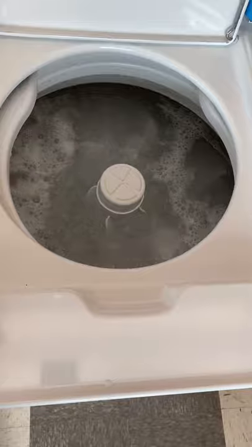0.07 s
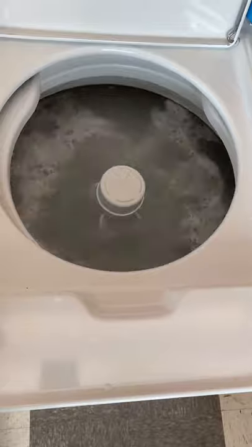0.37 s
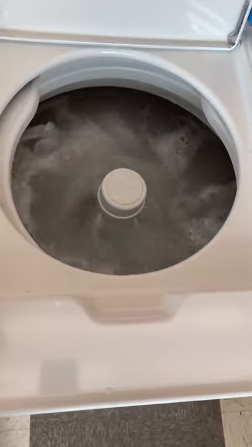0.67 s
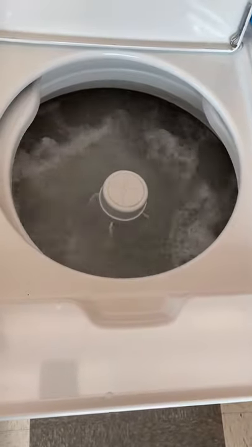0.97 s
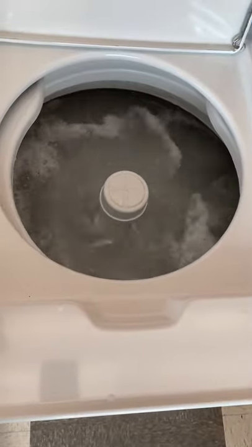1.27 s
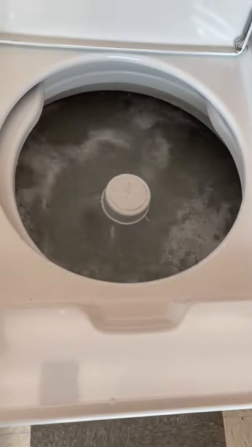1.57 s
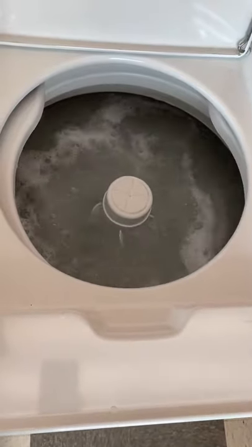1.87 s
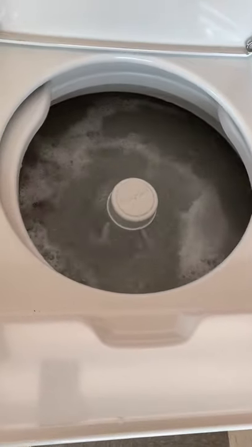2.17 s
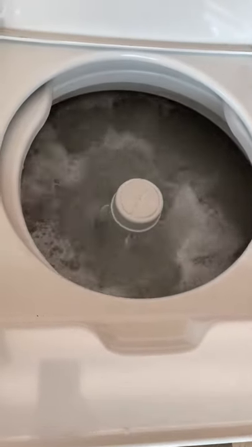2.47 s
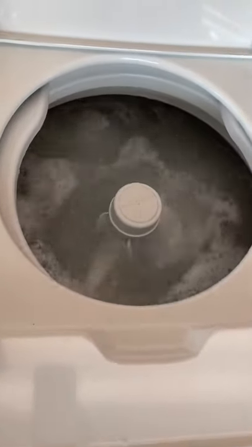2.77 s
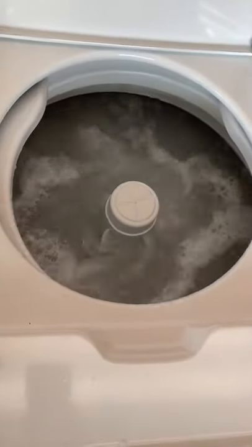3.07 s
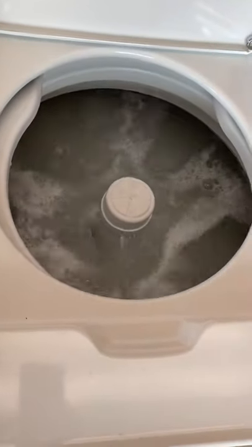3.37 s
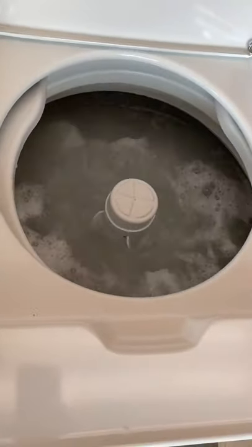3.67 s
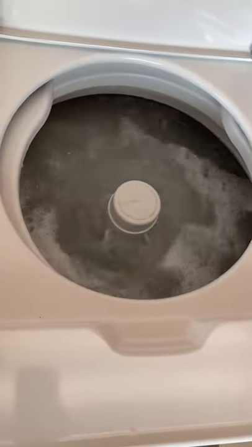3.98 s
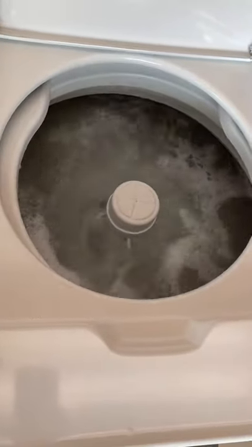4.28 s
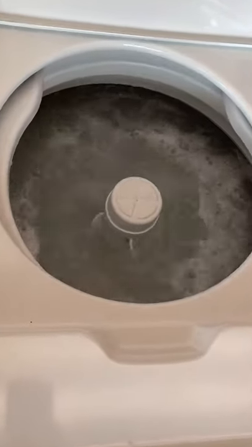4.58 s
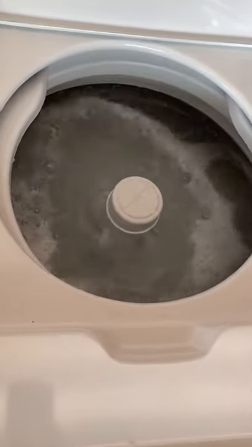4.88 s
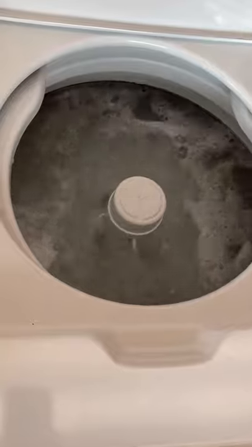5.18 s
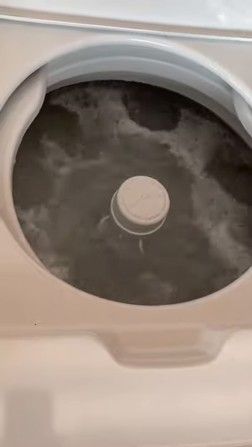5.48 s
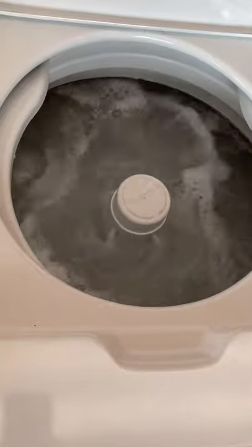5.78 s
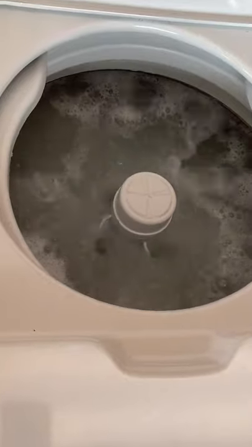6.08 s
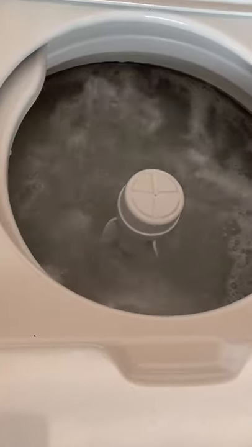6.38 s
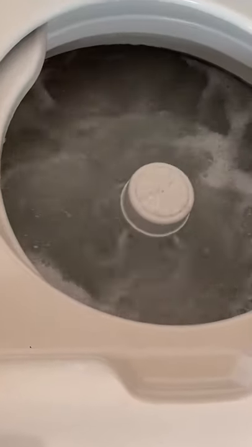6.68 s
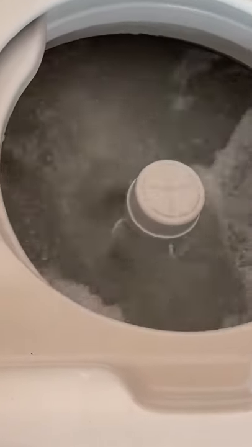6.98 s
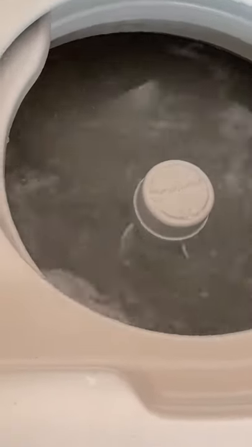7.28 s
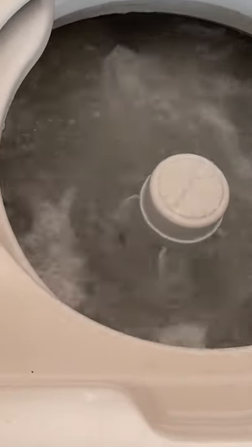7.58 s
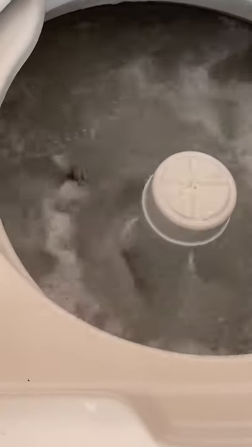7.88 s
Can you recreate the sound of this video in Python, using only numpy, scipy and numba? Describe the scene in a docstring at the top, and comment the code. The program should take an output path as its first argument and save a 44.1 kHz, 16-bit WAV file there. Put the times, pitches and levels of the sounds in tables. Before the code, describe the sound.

A top-loading washing machine agitates with its lid open, heard close from just above the tub. The motor hums and the gears drone through the steel cabinet, swaying with each stroke. A little over twice a second a wave folds over with gurgles, splashes and plops, while small slaps and drops spatter in between. The rhythm carries on unchanged throughout, with only a faint trace of the room.

```python
"""A top-loading washing machine agitates with its lid open, heard from just above the tub.
The motor hums and the gearbox drones through the steel cabinet, swaying with the load of each stroke.
A little over twice a second the agitator swings and a wave folds over: bubbles gurgle, splash and plop,
sheets of water slap, and spray and drops spatter. The water rings in the tub, the lid throws back
dull reflections, and a faint room tail sits behind."""
import sys
import numpy as np
from scipy import signal
from scipy.fft import rfft, irfft, next_fast_len
from scipy.io import wavfile
from scipy.ndimage import uniform_filter1d
from numba import njit

SR = 44100
rng = np.random.default_rng(int(sys.argv[2]) if len(sys.argv) > 2 else 0)


def generate_wav(sig):
    """Save sig (samples, or channels by samples) to the path in sys.argv[1] as 16-bit PCM at SR."""
    pcm = np.round(np.clip(np.atleast_2d(sig).T, -1, 1) * 32767).astype(np.int16)
    wavfile.write(sys.argv[1], SR, pcm)


N = 349272

# Table levels are relative: each layer adds its own gain.
# slow waver of the motor hum: t/s, level/dB
HUM_ENVELOPE = [(0.03, -27), (0.14, -25), (0.27, -29), (0.47, -27), (0.9, -35.5), (1.03, -28), (1.3, -27),
                (1.6, -29), (1.71, -46), (1.78, -29.5), (1.88, -25), (2.18, -34.5), (2.39, -27.5),
                (2.62, -29.5), (2.83, -26.5), (3.13, -34), (3.42, -25.5), (3.54, -38), (3.7, -28.5),
                (3.82, -26.5), (4.03, -36), (4.22, -26.5), (4.56, -35), (4.87, -29), (5.02, -32.5),
                (5.25, -24.5), (5.45, -39), (5.58, -29.5), (5.77, -34.5), (6.01, -25.5), (6.36, -34.5),
                (6.6, -34), (6.78, -28.5), (7.03, -26.5), (7.18, -33.5), (7.4, -28.5), (7.9, -28)]
# steady tones of the motor shaft and the mains: f/Hz, level/dB
MOTOR_TONES = [(58.6, -46.5), (180, -42), (600, -63.5), (1080, -57)]
# side panel swelling as the agitator pushes and again as it turns back: crest t/s, level/dB
PANEL_SWELLS = [(0.077, -23), (0.323, -30), (0.531, -25), (0.66, -30), (0.8, -25), (0.98, -26),
                (1.26, -27.5), (1.445, -25.5), (1.65, -27), (1.9, -27.5), (2.08, -30), (2.2, -27.5),
                (2.347, -27.5), (2.59, -23.5), (2.815, -26), (3.06, -26.5), (3.293, -31), (3.515, -24),
                (3.688, -27.5), (3.9, -27), (4.021, -24.5), (4.154, -28.5), (4.46, -26.5), (4.62, -28.5),
                (4.79, -26), (4.904, -25), (5.103, -31.5), (5.33, -24.5), (5.535, -25), (5.78, -26.5),
                (5.945, -26.5), (6.255, -26), (6.422, -29), (6.64, -26), (6.75, -28.5), (6.868, -29),
                (7.09, -29), (7.228, -29), (7.361, -29.5), (7.62, -24.5), (7.82, -30)]
# resonance of the side panel: f/Hz, width/Hz, level/dB
PANEL_MODES = [(229.9, 28.4, 1.5)]
# gears taking the load once a stroke: crest t/s, level/dB
GEAR_SWELLS = [(0.2, -29.5), (0.35, -27), (0.724, -31.5), (1.15, -27), (1.636, -29), (2.151, -30.5),
               (2.514, -31.5), (3.02, -27), (3.49, -31), (3.9, -29), (4.42, -29), (4.879, -31), (5.34, -30),
               (5.791, -29), (6.172, -32), (6.664, -33.5), (7.05, -30.5), (7.6, -32.5), (7.853, -32)]
# resonances of the steel cabinet: f/Hz, width/Hz, level/dB
CABINET_MODES = [(85.4, 17, 0.5), (123.7, 12, 1.5), (160, 14.6, 3.5), (180.3, 6, -9.5), (204, 15.5, 3),
                 (258.9, 21.6, 4), (296.4, 16.7, 3), (329.1, 22.4, 0), (350.6, 17.6, -3), (403.7, 16.5, -7),
                 (464, 26.4, -10.5), (540, 14, -34), (621, 29, -17), (692.4, 17.5, -15.5), (793, 3, -20.5),
                 (918, 130, -19.5)]
# spectrum of belt and bearing noise: f/Hz, level/dB
BELT_SPECTRUM = [(20, -11), (45, 6), (75, -1), (330, 5.5), (520, -4.5), (800, 1), (1080, -5), (1600, -8),
                 (2500, -11), (4000, -20.5), (8000, -31), (16000, -35.5)]
# one folding wave per stroke: crest t/s, half-width/s, splash level/dB, foam level/dB
STROKE_WAVES = [(0.382, 0.06, -40.5, -51.5), (0.831, 0.056, -39.5, -54), (1.257, 0.062, -40.5, -55),
                (1.735, 0.042, -47, -56.5), (2.171, 0.05, -39, -50.5), (2.622, 0.05, -41, -54.5),
                (3.078, 0.07, -39.5, -53), (3.543, 0.084, -38, -52.5), (4.005, 0.05, -40.0, -48),
                (4.444, 0.076, -41, -52), (4.888, 0.066, -45, -55.5), (5.367, 0.073, -40, -53),
                (5.781, 0.071, -41.5, -52.5), (6.273, 0.075, -41, -53.5), (6.694, 0.055, -42.5, -56),
                (7.163, 0.059, -43.0, -56.5), (7.585, 0.062, -42.5, -56)]
# spectrum of the churning water: f/Hz, level/dB
WATER_SPECTRUM = [(400, 16), (700, -9.5), (1050, 3), (1700, -7.5), (2500, -3.5), (3400, -14.5), (5200, -9),
                  (6800, -18), (8500, -9), (12000, -11.5), (16000, -9.5)]
# single bubbles, deep glugs to chirps: t/s, level/dB, f/Hz, ring time/s, climb/(share of f per s)
BIG_BUBBLES = [(0.324, -32, 1324, 0.048, 2), (0.354, -33, 1670, .02, 1.8), (0.3555, -32, 4450, .012, 3),
               (0.374, -25, 5350, 0.012, 4.5), (0.421, -31.5, 2050, 0.026, 2.2),
               (0.541, -33.5, 1240, 0.032, 2), (0.611, -27.5, 4170, 0.0051, 4), (0.778, -35, 1440, 0.05, 2),
               (0.792, -33, 1120, 0.048, 1), (0.806, -32, 1490, .028, 2), (0.806, -27, 2360, 0.015, 3),
               (0.823, -33, 1130, .03, 2), (0.826, -26.5, 400, 0.049, 0.82), (0.884, -38, 1700, .03, 2),
               (0.886, -37, 2600, .025, 3), (0.926, -37, 1510, 0.037, 2), (1.071, -27.5, 2410, 0.017, 9.9),
               (1.2, -20, 2220, 0.011, 3), (1.215, -30, 2140, .02, 3), (1.214, -24.5, 1075, 0.023, 1),
               (1.272, -36, 1020, .04, 1), (1.331, -28.5, 1500, 0.035, 2), (1.39, -31, 1030, 0.047, 1),
               (1.745, -31.5, 1085, 0.033, 1), (1.834, -36.5, 2550, .03, 3), (2.031, -31, 1410, .025, 2),
               (2.089, -22, 1770, 0.016, 2), (2.127, -32, 2320, .02, 3), (2.169, -31, 2500, 0.025, 3),
               (2.174, -32, 3770, .012, 3), (2.209, -31.5, 2030, .025, 2), (2.329, -30, 1214, .036, 1),
               (2.359, -28, 1070, 0.035, 1), (2.361, -32, 1580, 0.022, 2), (2.377, -26.5, 2340, 0.023, 3),
               (2.589, -21.5, 2000, 0.013, 3), (2.6428, -32, 5300, .011, 3), (2.649, -26, 2570, 0.021, 3),
               (2.704, -29.5, 2830, 0.014, 3), (2.729, -30.5, 2280, .018, 3),
               (2.863, -30.5, 5760, 0.011, 3), (2.956, -33, 1450, 0.032, 2), (2.997, -34, 2620, 0.018, 3),
               (3.083, -29, 1990, 0.028, 2), (3.166, -29.5, 1220, 0.032, 1), (3.4, -28.5, 1900, 0.017, 2),
               (3.492, -19.5, 2450, 0.016, 3), (3.494, -32, 1400, .028, 2), (3.496, -31, 3080, .016, 3),
               (3.575, -30, 2360, .018, 3), (3.651, -35, 567, 0.057, 1), (3.894, -25.5, 2670, 0.017, 5.4),
               (4.056, -34, 2400, 0.02, 3), (4.115, -35, 492, 0.16, 0.9), (4.239, -30, 5060, 0.009, 4),
               (4.357, -25, 2070, 0.0093, 2), (4.381, -34, 1830, .024, 2), (4.414, -32, 1020, 0.045, 1),
               (4.416, -31, 510, 0.082, 1), (4.427, -25.5, 927, 0.052, 0.83),
               (4.478, -31.5, 1000, 0.057, 1), (4.614, -30, 2400, 0.017, 3), (4.76, -35, 1400, .04, 2),
               (4.992, -35.5, 2490, 0.046, 1), (5.106, -27, 2620, 0.016, 8), (5.164, -30, 2560, 0.013, 3),
               (5.348, -26, 4880, 0.0068, 4), (5.365, -36, 2200, 0.02, 4), (5.389, -24, 2600, 0.016, 3),
               (5.416, -41, 2330, 0.027, 1), (5.427, -20, 1025, 0.042, 1), (5.428, -28, 1750, 0.022, 0.84),
               (5.44, -37, 1620, .04, 1), (5.441, -29, 1200, .04, 1), (5.461, -38, 1153, .08, 1),
               (5.489, -23, 2730, 0.0083, 3), (5.576, -29.5, 5740, 0.0087, 4),
               (5.758, -25, 5900, 0.0058, 4), (5.77, -31, 1020, 0.031, 1), (5.778, -33, 1790, .026, 2),
               (5.809, -36.5, 1890, .03, 2), (5.957, -33, 2094, 0.065, 15), (5.994, -37.5, 3350, 0.027, 7),
               (6.171, -26.5, 2300, 0.011, 10), (6.223, -37, 990, .045, 1), (6.234, -36, 2170, .07, 7.7),
               (6.303, -22, 2420, 0.011, 3), (6.309, -33, 1150, 0.042, 1), (6.326, -34, 2340, .035, 3),
               (7.119, -27.5, 1017, 0.054, 7.8), (7.466, -29, 1084, 0.06, 1), (7.504, -32, 2870, 0.032, 14),
               (7.561, -32, 1090, 0.028, 1.1), (7.597, -32, 1320, 0.027, 2), (7.599, -33, 1030, .04, 1)]
# sheets of water hitting the surface: t/s, level/dB, f/Hz
SLAP_HITS = [(0.208, -34, 3460), (0.3243, -32.5, 4200), (0.372, -34, 1900), (0.451, -32.5, 4000),
             (0.741, -39, 3600), (0.8048, -30, 3800), (0.8254, -39, 1900), (0.8244, -22, 5100),
             (1.1995, -30, 4250), (1.2967, -38, 4200), (1.3654, -44, 5000), (1.42, -36, 1700),
             (1.7454, -31.5, 4830), (1.806, -39, 5200), (2.031, -35.5, 2900), (2.129, -30, 2600),
             (2.177, -38, 3700), (2.2026, -30.5, 2300), (2.533, -35, 3300), (2.545, -33.5, 4400),
             (2.6173, -33, 3200), (2.997, -33, 4400), (3.019, -46, 4400), (3.062, -32, 2400),
             (3.076, -27, 2300), (3.145, -33, 2880), (3.399, -33.5, 3800), (3.4215, -38, 4400),
             (3.4508, -35, 3500), (3.47, -32, 2500), (3.4946, -42, 2600), (3.6498, -48, 3500),
             (3.703, -42, 4500), (3.86, -40, 4600), (3.9133, -37, 4000), (4.385, -33, 2600),
             (4.4421, -38, 4500), (4.546, -31.5, 3500), (4.8197, -38, 4500), (4.894, -33.5, 4000),
             (4.938, -34, 3000), (5.1642, -34, 3000), (5.2404, -34, 3680), (5.2798, -40, 5200),
             (5.298, -35, 4200), (5.4413, -34, 5000), (5.628, -33, 3000), (5.775, -37, 3800),
             (5.811, -33, 4500), (5.8414, -34.5, 4500), (6.1275, -39, 5000), (6.171, -36, 2500),
             (6.3, -29.5, 1500), (6.3017, -27, 4770), (6.6572, -33, 4820), (6.6926, -30.5, 4160),
             (7.085, -33, 3000), (7.1767, -30, 4000), (7.2082, -28, 2200), (7.22, -29, 2200),
             (7.448, -34, 2400), (7.5975, -31, 4200), (7.619, -35, 4800)]
# flung drops hitting the water and the tub wall: t/s, level/dB
DROP_HITS = [(0.218, -32), (0.254, -31), (0.3086, -42), (0.3717, -30), (0.434, -26.5), (0.6947, -34.5),
             (0.825, -35), (0.9433, -32.5), (1.0668, -35), (1.424, -33), (1.476, -33.5), (1.6643, -36),
             (1.719, -33), (1.7258, -42), (1.744, -35), (1.8072, -40), (2.151, -40), (2.168, -33),
             (2.4309, -36), (2.588, -28), (2.6174, -29.5), (2.7305, -23), (2.923, -29.5), (2.9993, -42),
             (3.074, -25.5), (3.1537, -39), (3.5754, -34), (3.9182, -33), (3.973, -41), (4.001, -18.5),
             (4.007, -35), (4.0168, -18), (4.344, -31), (4.5537, -38), (4.711, -39), (5.2411, -33),
             (5.3775, -30), (5.478, -36), (5.489, -35), (5.6283, -33), (5.7216, -32), (5.758, -32),
             (5.7802, -31), (5.8401, -31), (6.309, -21), (6.655, -19.5), (6.784, -32), (7.221, -21),
             (7.4244, -40), (7.601, -35), (7.7144, -38)]
# phase by which the right side trails the left: f/Hz, phase/rad
STEREO_PHASE = [(450, 0), (1100, -.35), (1900, .1), (2750, .9), (3300, .4), (5100, .4), (6100, 1.7),
                (7250, 3.1), (8200, 3.6), (9700, 5.9), (11500, 6.8), (12400, 8.6), (13600, 9.4),
                (14900, 10.6), (16000, 12)]
# left side over right: f/Hz, level/dB
STEREO_BALANCE = [(100, 0), (380, 1), (750, 2.7), (1300, 2.5), (2300, 0), (6000, 0)]

TIME = np.arange(N) / SR
HUM_HZ, PANEL_HZ, GEAR_HZ = 120.02, 236.8, 321.7
TUB_T60_S, LID_T60_S, ROOM_T60_S = 0.094, 0.049, 0.17


def motor(hum_gain_db=-2):
    """The motor's hum wavers in level over the steady tones of shaft and mains."""
    hum_db = np.interp(TIME, *np.transpose(HUM_ENVELOPE))
    hum = from_db(hum_db + hum_gain_db) * tone(HUM_HZ * TIME)
    return hum + sum(from_db(db) * tone(hz * TIME + rng.random()) for hz, db in MOTOR_TONES)


def panel_drone(gain_db=-2.42, wander_hz=3.645, waver_db=0.65, rattle_db=-9.5):
    """The side panel drones near twice the hum's pitch, swelling about twice a stroke."""
    turns = np.cumsum(PANEL_HZ + wander_hz * drift(rate=20)) / SR
    drone = rms_one(tone(turns) + from_db(rattle_db) * shaken_steel(PANEL_MODES))
    level_db = swells(PANEL_SWELLS, half_width_s=0.037, rest_db=-38.5)
    return from_db(level_db + gain_db + waver_db * drift(rate=14)) * drone


def gear_growl(gain_db=-2.7, wander_hz=3.51, waver_db=1.95):
    """The gears growl under each stroke's load; their unsteady speed bends the pitch."""
    turns = np.cumsum(GEAR_HZ + wander_hz * drift(rate=22)) / SR
    level_db = swells(GEAR_SWELLS, half_width_s=0.064, rest_db=-42.5)
    return from_db(level_db + gain_db + waver_db * drift(rate=9)) * tone(turns)


def shaken_steel(modes):
    """Steel panels ring under random shaking; two filter passes keep the valleys dark."""
    out = 0
    for hz, width, db in modes:
        r = np.exp(-np.pi * width * np.pi / 2 / SR)  # pole radius
        band = [(1 - r * r) / 2, 0, (r * r - 1) / 2, 1, -2 * r * np.cos(2 * np.pi * hz / SR), r * r]
        out = out + from_db(db) * signal.sosfilt([band, band], rng.standard_normal(N + SR))[SR:]
    return rms_one(out)


def cabinet_rumble(level_db=-32.5, smooth_s=0.135):
    """The gearbox shakes the cabinet: a rumble held level, with only its fast flutter left in."""
    rumble = shaken_steel(CABINET_MODES)
    window = int(smooth_s * SR)
    power = uniform_filter1d(uniform_filter1d(rumble ** 2, window), window)
    return from_db(level_db) * rumble / np.sqrt(np.abs(power) + 1e-12)


def churn(breakup_db=2.0):
    """Each stroke folds a wave over: big bubbles gurgle, small ones splash, foam fizzes, drops spatter."""
    ragged = from_db(breakup_db * drift(rate=45)) ** 2  # a wave lands as a run of splats
    splash_power = foam_power = 0
    for crest_s, half_width_s, crest_db, foam_db in STROKE_WAVES:
        surge = ragged * bell(crest_s, half_width_s)
        splash_power += surge * from_db(crest_db) ** 2
        foam_power += surge * from_db(foam_db) ** 2
    gurgle_db = over_floor(-42, splash_power)
    splash_db = over_floor(-46.5, splash_power)
    fine_db = over_floor(-46, splash_power * from_db(-1.5) ** 2)
    spray_db = over_floor(-62.5, foam_power)
    gurgle = swarm(gurgle_db - 7, 530, 1545, per_s=350, spread_db=3.5, cycles=38, wash_db=-1.5)
    splash = swarm(splash_db - 7, 1535, 3023, per_s=480, spread_db=4.5, cycles=38, wash_db=-4.5)
    fine = swarm(fine_db - 12.5, 3210, 6590, per_s=900, spread_db=3, cycles=82, wash_db=-4.5)
    spray = swarm(spray_db - 3.5, 7500, 16200, per_s=450, spread_db=7.5, cycles=28, wash_db=1)
    return gurgle + splash + fine + spray + spatter(splash_db - 5.5)


def swarm(level_db, low_hz, high_hz, per_s, spread_db, cycles, wash_db):
    """A stronger surge brings more and louder bubbles, in clumps; the tiniest merge into a wash."""
    surge = (level_db - level_db.min()) / np.ptp(level_db)
    clumps_db = 3.5 * surge * drift(rate=70)
    level = from_db(level_db + clumps_db)
    when, pitch, size, ring = rng.random((int(per_s * N / SR), 4)).T
    start = onsets(when, density=level ** 1.5)
    hz = low_hz * (high_hz / low_hz) ** pitch
    size_db = spread_db * np.minimum(-np.log(size), 4)  # mostly quiet, a few loud
    height = from_db(at_hz(WATER_SPECTRUM, hz) + size_db + 0.85 * level_db[start]) * hz
    bubbles = ring_bubbles(start, height, hz, cycles * (.5 + ring) / hz, np.full(len(hz), 0.13))
    wash = rms_one(band_pass(coloured_noise(WATER_SPECTRUM), low_hz, high_hz))
    return rms_one(bubbles) * np.sqrt(np.mean(level ** 2)) + from_db(wash_db) * level * wash


@njit
def ring_bubbles(start, height, hz, ring_s, rise):
    """Each bubble is a sine that dies by 60 dB over its ring time and climbs in pitch on its way up."""
    out = np.zeros(N)
    for k in range(len(start)):
        life = ring_s[k] * SR
        fade = np.exp(-np.log(1000) / life)
        turns, gain = 0., height[k]
        for i in range(min(int(life), N - start[k])):
            turns += hz[k] / SR * (1 + rise[k] * i / life)
            gain *= fade
            attack = min(turns, 1.)
            out[start[k] + i] += gain * attack * np.sin(2 * np.pi * turns)
    return out


def plops(gain_db=4, splat_db=-20.5, splat_s=0.0053):
    """A large bubble rings amid a brief splat; the nearer the surface, the faster its pitch climbs."""
    times, db, hz, ring_s, climb = np.transpose(BIG_BUBBLES)
    heights = from_db(db + gain_db)
    out = ring_bubbles((times * SR).astype(int), heights, hz, ring_s, climb * ring_s)
    t = np.arange(SR // 20) / SR
    for at_s, height, pitch in zip(times, heights, hz):
        splat = rms_one(band_pass(rng.standard_normal(len(t)), 0.63 * pitch, 1.12 * pitch))
        add(out, at_s, height * from_db(splat_db) * splat * np.exp(-t / splat_s))
    return out


def offshoots(count=2, gain_db=-6, scatter_s=0.028):
    """A large bubble sheds smaller ones that ring just after it, around its pitch."""
    times, db, hz, ring_s, climb = np.repeat(BIG_BUBBLES, count, axis=0).T
    lateness, size, tuning = rng.random((len(times), 3)).T
    pitch = hz * 2 ** (0.75 * tuning - 0.25)  # a quarter octave down to half an octave up
    start = ((times + scatter_s * lateness) * SR).astype(int)
    height = from_db(db + gain_db) * (.5 + size)
    return ring_bubbles(start, height, pitch, ring_s * hz / pitch, climb * ring_s)


def slaps(attack_s=0.00039, decay_s=0.0032, gain_db=0.2):
    """A sheet of water smacks the surface: a sharp burst about an octave wide, lower for a larger sheet."""
    out, t = np.zeros(N), np.arange(SR // 25) / SR
    envelope = np.exp(-t / decay_s) * (1 - np.exp(-t / attack_s))
    for at_s, db, hz in SLAP_HITS:
        burst = rms_one(band_pass(rng.standard_normal(len(t)), hz / 0.99, hz * 0.99))
        add(out, at_s, from_db(db + gain_db) * burst * envelope)
    return out


def drops(attack_s=0.0001, decay_s=0.002):
    """A flung drop lands with a short, bright crack."""
    out, t = np.zeros(N), np.arange(SR // 20) / SR
    envelope = np.exp(-t / decay_s) * (1 - np.exp(-t / attack_s))
    for at_s, db in DROP_HITS:
        crack = filtered(rng.standard_normal(len(t)) * envelope, "low", 16000)
        add(out, at_s, from_db(db) * crack)
    return filtered(out, "high", 4200)


def spatter(level_db, per_s=45, spread_db=0.1, decay_s=0.0019):
    """Small drops land at random with unpitched ticks, thickest while a wave breaks."""
    when, size = rng.random((int(per_s * N / SR), 2)).T
    start = onsets(when, density=from_db(level_db) ** 1.1)
    size_db = spread_db * np.minimum(-np.log(size), 3)
    out, t = np.zeros(N), np.arange(SR // 40) / SR
    for at_s, db in zip(start / SR, size_db + level_db[start]):
        add(out, at_s, from_db(db) * rng.standard_normal(len(t)) * np.exp(-t / decay_s))
    return band_pass(out, 2200, 13000)


def belt_and_bearings(level_db=-42.5):
    """The running belt and bearings lay a dark, steady noise bed."""
    return from_db(level_db) * coloured_noise(BELT_SPECTRUM)


def lid_reflections(x, paths=3, shifts_per_s=12):
    """Dull reflections off the open lid, by paths that crossfade as the water heaves."""
    dull = band_pass(filtered(x, "high", 356), 356, 6500)
    shares = np.array([drift(shifts_per_s) for _ in range(paths)])
    shares /= np.linalg.norm(shares, axis=0)
    return sum(share * reverb(dull, LID_T60_S, delay_s=.001) for share in shares)


def reverb(x, t60_s, delay_s):
    """Dense reflections die away after a pre-delay, at unit energy."""
    t = np.arange(int(t60_s * SR)) / SR
    tail = rng.standard_normal(len(t)) * from_db(-60 * t / t60_s)
    response = np.concatenate([np.zeros(int(delay_s * SR)), tail / np.linalg.norm(tail)])
    return signal.oaconvolve(x, response)[:N]


def stereo_spread(x):
    """Sound from the tub reaches left and right with different phase and strength."""
    size = next_fast_len(N + SR // 10)
    hz = np.fft.rfftfreq(size, 1 / SR)
    left = from_db(at_hz(STEREO_BALANCE, hz) / 2) * np.exp(.5j * at_hz(STEREO_PHASE, hz))
    return irfft(rfft(x, size) * np.array([left, 1 / left]), size)[:, :N]


def swells(rows, half_width_s, rest_db):
    """Envelope in dB of bell-shaped swells above a resting level."""
    power = sum(from_db(db) ** 2 * bell(crest_s, half_width_s) for crest_s, db in rows)
    return over_floor(rest_db, power)


def bell(crest_s, half_width_s):
    """A smooth rise and fall that peaks at 1."""
    return np.exp(-.5 * np.minimum(((TIME - crest_s) / half_width_s) ** 2, 100))


def over_floor(floor_db, power):
    """Level in dB of a power curve on top of a steady floor."""
    return 10 * np.log10(from_db(floor_db) ** 2 + power)


def onsets(when, density):
    """Turn draws from 0 to 1 into start samples that crowd where the density is high."""
    births = np.cumsum(density)
    return np.searchsorted(births / births[-1], when).clip(0, N - 1)


def drift(rate):
    """Smooth random modulation of unit power that changes about rate times a second."""
    steps = signal.resample_poly(rng.standard_normal(1200), 8, 1)
    return rms_one(np.interp(TIME * rate * 8, np.arange(len(steps)), steps))


def tone(turns):
    """Sine of unit power, its phase given in cycles."""
    return np.sqrt(2) * np.sin(2 * np.pi * turns)


def coloured_noise(spectrum):
    """Noise of unit power with the given spectrum."""
    gain = from_db(at_hz(spectrum, np.fft.rfftfreq(N, 1 / SR)))
    return rms_one(irfft(rfft(rng.standard_normal(N)) * gain, N))


def at_hz(table, hz):
    """Read a curve on a log-frequency axis."""
    table_hz, values = np.transpose(table)
    return np.interp(np.log(np.maximum(hz, 1)), np.log(table_hz), values)


def band_pass(x, low_hz, high_hz):
    """Low cut, then high cut."""
    return filtered(filtered(x, "high", low_hz), "low", high_hz)


def filtered(x, kind, hz):
    """Second-order low- or high-pass."""
    return signal.sosfilt(signal.butter(2, min(hz, .45 * SR), kind, fs=SR, output="sos"), x)


def add(track, at_s, sound):
    """Mix a one-shot into the track."""
    start = int(np.clip(at_s * SR, 0, N - 1))
    track[start:start + len(sound)] += sound[:N - start]


def from_db(db):
    """Decibels to gain."""
    return 10 ** (np.asarray(db) / 20)


def rms_one(x):
    """Scale to unit power."""
    return x / np.sqrt(np.mean(x ** 2) + 1e-20)


def scene():
    """Machine and water both bounce off the lid; only the water feeds the tub and room reverbs."""
    water = churn() + plops() + offshoots() + slaps() + drops()
    tub = from_db(0.26) * water + from_db(-11) * reverb(water, TUB_T60_S, delay_s=.002)
    machine = motor() + panel_drone() + gear_growl() + cabinet_rumble() + belt_and_bearings()
    direct = machine + tub
    lid = np.array([lid_reflections(direct) for side in range(2)])
    room = np.array([reverb(tub, ROOM_T60_S, delay_s=.006) for side in range(2)])
    return stereo_spread(direct) + from_db(-8) * lid + from_db(-28.5) * room


def record(dry, silence_s=0.035, fade_s=0.004, cutoff_hz=15900):
    """A quick fade-in after an instant of silence, and a steep high cut."""
    fade_in = np.clip((TIME - silence_s) / fade_s, 0, 1)
    high_cut = signal.ellip(10, .2, 70, cutoff_hz, fs=SR, output="sos")
    return signal.sosfilt(high_cut, dry * fade_in)


dry = scene()
out = record(dry)
generate_wav(out)
```